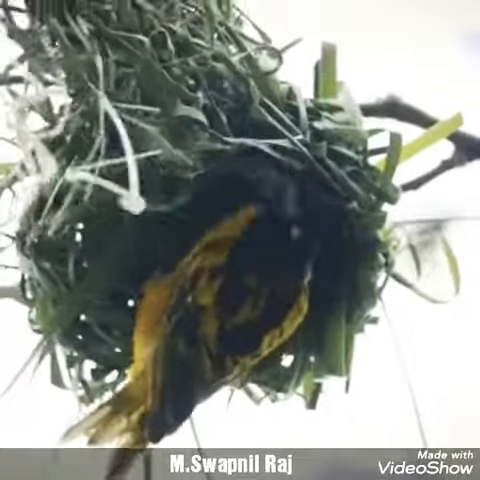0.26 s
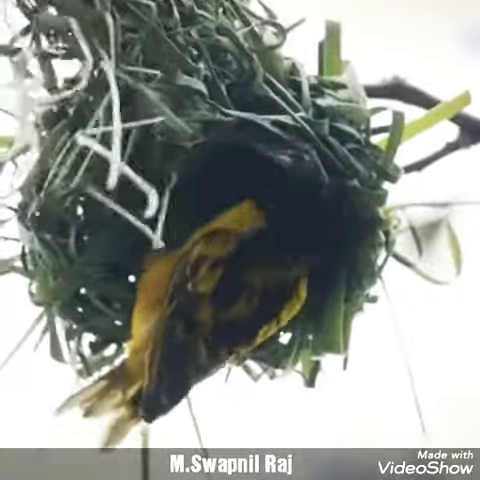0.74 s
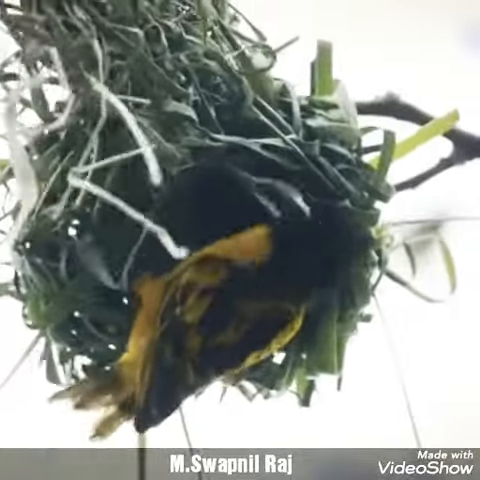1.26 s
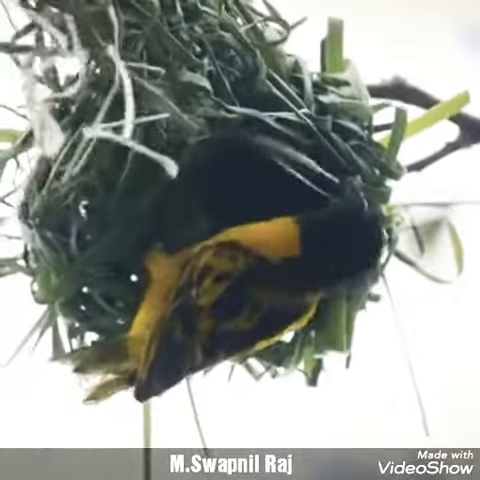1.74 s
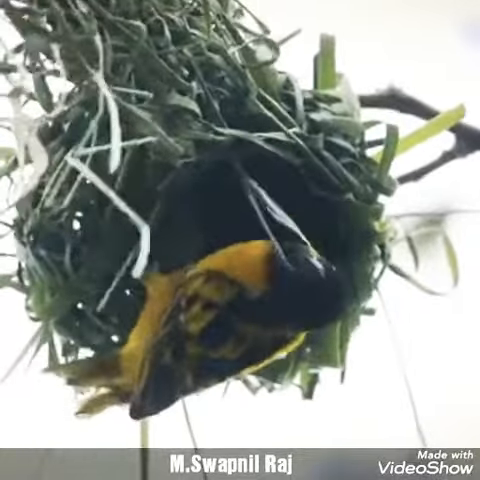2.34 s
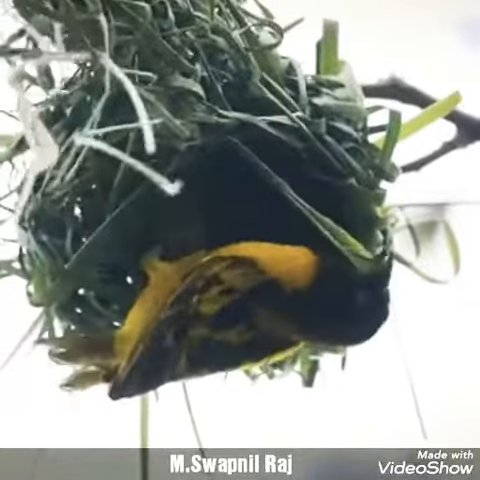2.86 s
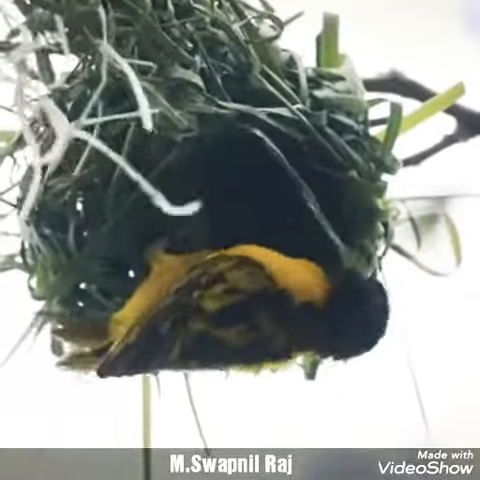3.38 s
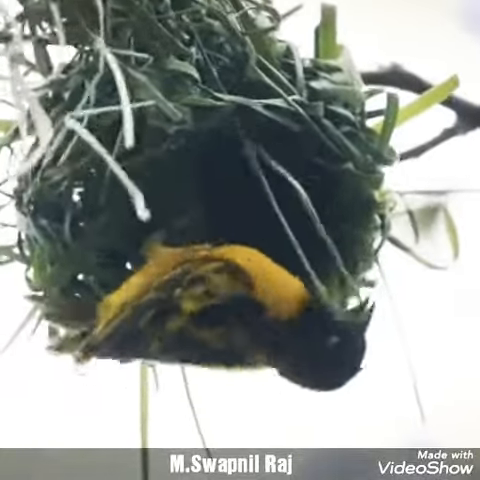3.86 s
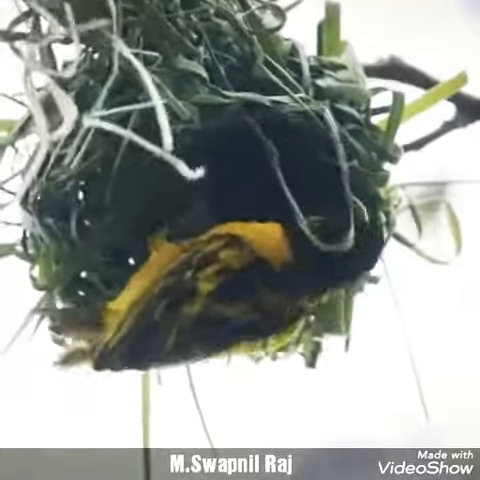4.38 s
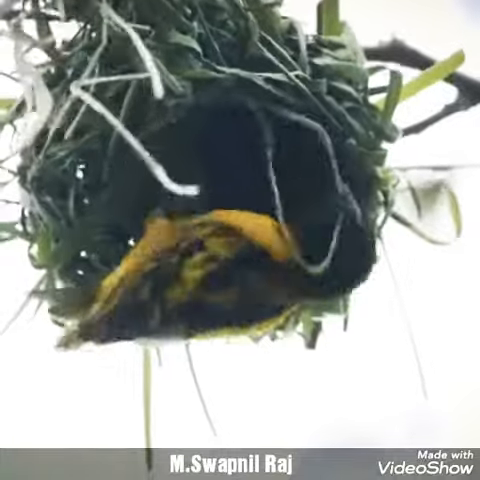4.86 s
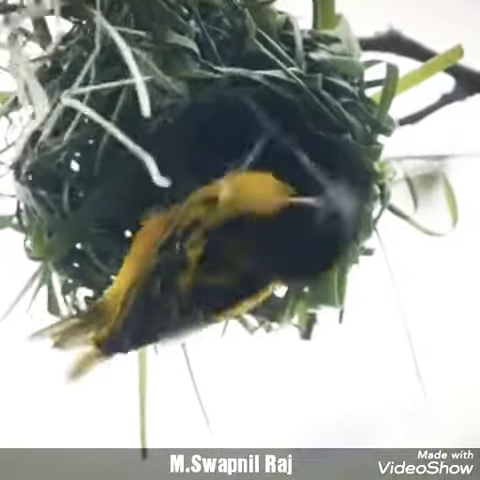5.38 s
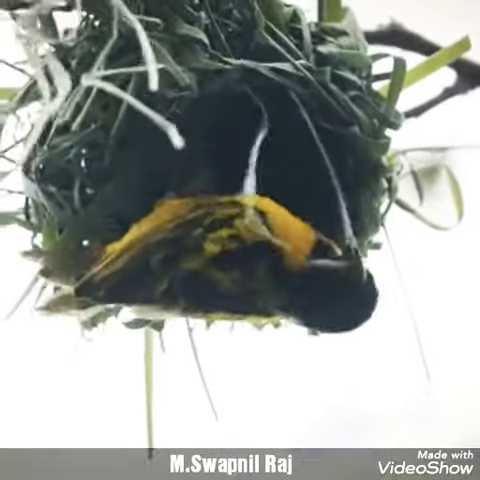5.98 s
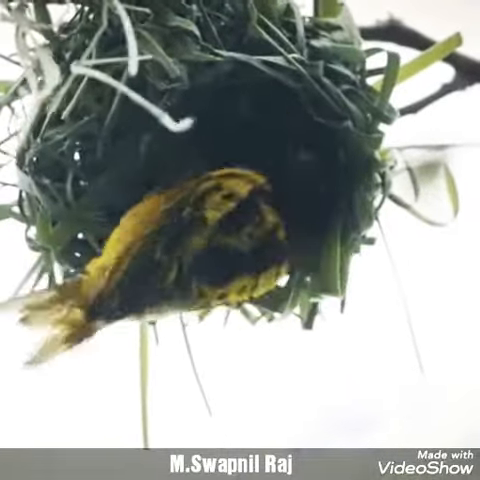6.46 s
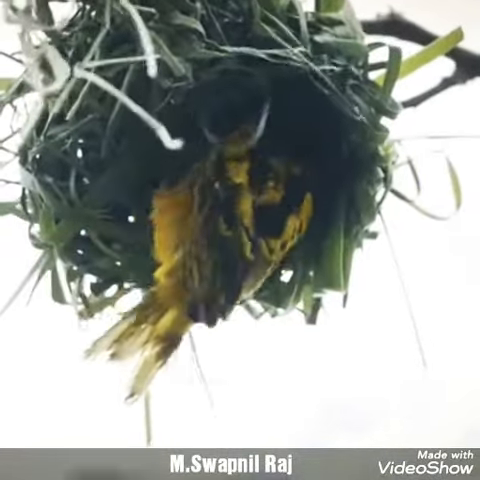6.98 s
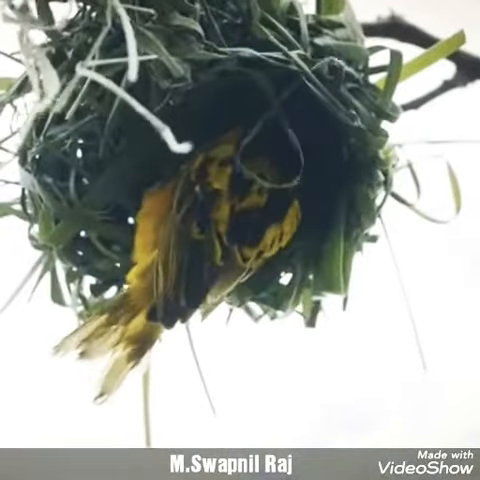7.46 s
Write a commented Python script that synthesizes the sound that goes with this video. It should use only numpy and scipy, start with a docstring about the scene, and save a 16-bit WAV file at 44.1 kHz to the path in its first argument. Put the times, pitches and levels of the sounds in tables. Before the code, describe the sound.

Weaver birds tweet, tick and cheep busily in a tree, with faint rubs of grass and a brief lull crossed by a whistle.

```python
"""Weaver birds chatter in a tree, voiced by vibrating membranes, over a steady outdoor rumble.
A farther bird opens with a warbled phrase above a distant twitter and a faint hum that dies away.
Near birds join with tweets, rasps, chips and ticks, then cheeps that break into gargles, while one tugs
grass into its nest. Near 4 s a long whistle crosses a lull; then the chatter returns with hoarse churrs.
Throughout, foliage scatters the calls; one microphone feeds the left, and the right is almost silent."""
import sys
import numpy as np
from scipy import signal
from scipy.fft import rfft, irfft, next_fast_len
from scipy.io import wavfile
from scipy.ndimage import map_coordinates

SR = 44100
rng = np.random.default_rng(int(sys.argv[2]) if len(sys.argv) > 2 else 0)


def transcribe(signal):
    """Save signal, clipped to [-1, 1], as a 16-bit WAV file at the path in sys.argv[1]."""
    frames = np.atleast_2d(signal).T
    limited = np.clip(frames, -1, 1)
    pcm = np.round(limited * 32767).astype(np.int16)
    wavfile.write(sys.argv[1], SR, pcm)


N = 340893


def from_db(db):
    """Decibels to amplitude ratio."""
    return 10 ** (np.asarray(db) / 20)


def rms_one(x):
    """Normalisation to rms 1."""
    return x / np.sqrt(np.mean(x ** 2) + 1e-20)


def coloured(x, spectrum):
    """Spectral shaping by rows of frequency_hz, gain_db."""
    hz, db = np.transpose(spectrum)
    size = next_fast_len(len(x) + 512)
    bins_hz = np.arange(size // 2 + 1) * SR / size
    gain = from_db(np.interp(np.log(bins_hz + 1), np.log(hz), db))
    return irfft(rfft(x, size) * gain, size)[:len(x)]


def wobble(count, rate_hz):
    """Smooth random modulation with a spread of about 1."""
    steps = np.arange(count) * rate_hz / SR
    knots = rng.standard_normal(int(steps[-1]) + 3)
    return map_coordinates(knots, [steps + 1], order=2, mode="nearest")


def clock(length):
    """Sample times over one sound, in seconds."""
    return np.arange(max(int(length * SR), 64)) / SR


def progress(length):
    """Normalised time, 0 to 1 over one sound."""
    return np.linspace(0, 1, len(clock(length)))


def swell(count, edge):
    """Envelope whose rise and fall together take the share `edge` of the length."""
    return signal.windows.tukey(count, edge)


def add(track, start, sound):
    """Superposition of a sound at its start time."""
    at = int(np.clip(start * SR, 0, N - 1))
    track[at:at + len(sound)] += sound[:N - at]


def syrinx(hz, first_db, octave_db, jitter, shimmer_db,
           third_db=-19, fourth_db=-20, flutter_hz=900, buzz_hz=1100):
    """Membrane oscillation: five harmonics whose pitch and level shake in the unsteady airflow."""
    count = len(hz)
    unsteady_hz = hz * (1 + jitter * wobble(count, flutter_hz))
    phase = 2 * np.pi * np.cumsum(unsteady_hz) / SR
    buzz = .7 + wobble(count, buzz_hz)
    third = from_db(octave_db + third_db) * buzz
    top = from_db(octave_db + fourth_db) * buzz
    gains = [from_db(first_db), from_db(octave_db), third, top, top]
    tone = sum(gain * np.sin(k * phase) * (k * hz < SR / 2) for k, gain in enumerate(gains, 1))
    return np.sqrt(2) * tone * from_db(shimmer_db * wobble(count, 148.4))


def slurs(rows, bow_oct, octave_db, jitter, shimmer_db, edge):
    """Frequency glides along a parabola: both ends sag bow_oct below a straight sweep."""
    out = np.zeros(N)
    for start, length, mid_hz, glide_oct, db in rows:
        u = progress(length) - .5
        hz = mid_hz * 2 ** (glide_oct * u - bow_oct * (2 * u) ** 2)
        add(out, start, syrinx(hz, db, db + octave_db, jitter, shimmer_db) * swell(len(u), edge))
    return out


# spectrum of turbulence in the throat: frequency_hz, gain_db
THROAT_SPECTRUM = [(1900, 1), (3000, 10.5), (5200, -0.5), (8500, 7), (13200, -12), (15500, -28)]

def hoarse(voice, hiss_db):
    """Modulated turbulence: air hisses as the membranes swing, and the throat filters it."""
    hiss = coloured(voice * rng.standard_normal(N), THROAT_SPECTRUM)
    return voice + from_db(hiss_db) * np.std(voice) * rms_one(hiss)


# spectrum of the outdoor rumble: frequency_hz, gain_db
AIR_SPECTRUM = [(18, -50), (30, -32.5), (130, -1.5), (237, 5), (1400, -9.5), (2180, -9), (3070, -10.5),
                (6050, -12), (8720, -19), (13600, -35), (15500, -72)]

def air(level_db=-35.5):
    """Stationary broadband noise, strongest at low frequencies."""
    return from_db(level_db) * rms_one(coloured(rng.standard_normal(N), AIR_SPECTRUM))


# far low tones: pitch_hz, initial_level_db
HUM_TONES = [(290.7, -46.5), (559.9, -51)]

def hum(fade_s=2.1):
    """Gaussian decay: two wavering tones die away in the distance."""
    tones = sum(syrinx(np.full(N, hz), db, db - 38, jitter=.0094, shimmer_db=3.5, flutter_hz=12)
                for hz, db in HUM_TONES)
    return tones * np.exp(-(np.arange(N) / SR / fade_s) ** 2)


def foliage(x, t60_s, gap_s=.0017):
    """Scattering: leaves and branches return a cloud of echoes that decays exponentially."""
    t = clock(.6)
    echoes = rng.standard_normal(len(t)) * from_db(-60 * t / t60_s) * (t > gap_s)
    echoes = signal.lfilter(*signal.butter(1, 8000, fs=SR), echoes)
    return signal.fftconvolve(x, echoes / np.sqrt(np.sum(echoes ** 2)))[:N]


# envelope of the far colony: time_s, level_db
COLONY_ENVELOPE = [(0, -39), (3.2, -37), (3.7, -51.5), (4.84, -39), (5.3, -30.5), (5.85, -42.5),
                   (7.3, -52.5), (7.73, -35)]

def colony(calls=1500, pitch_hz=4000, spread_oct=.34, glide_oct=.4):
    """Incoherent summation: short random slurs of many far birds merge into a twitter."""
    start, length = rng.uniform(0, N / SR, calls), rng.uniform(.013, .072, calls)
    pitch, glide, level = rng.standard_normal((calls, 3)).T
    rows = np.column_stack([start, length, pitch_hz * 2 ** (spread_oct * pitch), glide_oct * glide, level])
    twitter = slurs(rows, bow_oct=.1025, octave_db=-10, jitter=.03, shimmer_db=4.5, edge=1)
    level_db = np.interp(np.arange(N) / SR, *np.transpose(COLONY_ENVELOPE))
    return from_db(level_db) * rms_one(twitter + foliage(twitter, t60_s=.092))


def phrase(points, gain_db, octave_db, jitter):
    """Frequency and amplitude modulation: one unbroken whistle follows a contour."""
    out = np.zeros(N)
    times, hz, db = np.transpose(points)
    t = times[0] + clock(times[-1] - times[0])
    level = np.interp(t, times, db) + gain_db
    tone = syrinx(np.interp(t, times, hz), level, level + octave_db, jitter, shimmer_db=1.2)
    add(out, times[0], tone * swell(len(t), .011))
    return out


# clear notes (the one at 1.228 s is the falling tail of the chip at 1.202 s) and low nasal notes: start_s,
# length_s, mid_pitch_hz, glide_oct, level_db
CLEAR_NOTES = [(.51, 0.024, 3840, 0.2, -35.5), (.585, 0.048, 3780, -0.32, -34.5),
               (1.228, 0.032, 4780, -.4, -39), (1.255, 0.07, 4000, 0.22, -39),
               (1.905, 0.053, 4040, -0.43, -30), (2.285, 0.12, 5245, -0.17, -25.5),
               (2.57, 0.075, 5160, -0.24, -37), (4.76, 0.216, 1860, -.06, -49),
               (6.665, 0.065, 3900, 0.1, -35), (7.22, 0.066, 3860, 0.14, -38)]
NASAL_NOTES = [(3.915, 0.075, 1560, -0.31, -43), (7.478, .022, 2130, -0.88, -39)]
# the opening warble and a long whistle with a catch in it: time_s, pitch_hz, relative_level_db
WARBLE_CONTOUR = [(0.0, 4480, -33), (0.012, 4470, -38.5), (0.084, 3445, -40), (0.092, 3640, -47),
                  (0.148, 4145, -37), (0.178, 3800, -58), (0.204, 3205, -41), (0.234, 3270, -52),
                  (0.242, 3820, -31), (0.276, 4400, -37), (0.296, 4560, -34), (0.352, 3480, -40),
                  (0.388, 4200, -33), (0.4, 4200, -56)]
LONG_CONTOUR = [(3.82, 3086, -51), (3.936, 3026, -37.5), (3.956, 2956, -39), (3.99, 2947, -34),
                (4.002, 3080, -37), (4.04, 3013, -44), (4.15, 2942, -38.5), (4.21, 2880, -50)]

def whistles(octave_db=-28):
    """Harmonic balance sets timbre: pure notes carry a weak octave, nasal ones a strong. Most come from farther
    birds; the clear note at 1.228 s is the falling tail of the near chip at 1.202 s."""
    clear = slurs(CLEAR_NOTES, bow_oct=.036, octave_db=octave_db, jitter=.005, shimmer_db=1.5, edge=.3)
    nasal = slurs(NASAL_NOTES, bow_oct=.17, octave_db=-6, jitter=.015, shimmer_db=2, edge=.5)
    warbled = phrase(WARBLE_CONTOUR, gain_db=4, octave_db=octave_db, jitter=.016)
    long_note = phrase(LONG_CONTOUR, gain_db=5.2, octave_db=octave_db, jitter=.003)
    return clear + nasal + warbled + long_note


# pulls of grass through the weave: start_s, length_s, level_db
GRASS_TUGS = [(0.77, .04, -33.5), (0.972, 0.075, -30.5), (2.062, 0.028, -32.5), (2.318, 0.09, -31),
              (3.054, 0.019, -26.5), (3.296, 0.023, -26.5), (3.722, 0.038, -29), (3.923, 0.064, -33.5),
              (4.149, 0.089, -31.5), (7.472, 0.089, -31.5)]
# spectrum of rubbing grass: frequency_hz, gain_db
GRASS_SPECTRUM = [(500, -38), (1000, -4.5), (1500, 1), (2200, 1.5), (3800, 4), (6500, 3), (9500, -3.5),
                  (15000, -21)]

def grass(slips_per_s=4000, spread_db=5):
    """Stick-slip friction: a blade gives a dense run of tiny clicks that swells with the pull."""
    out = np.zeros(N)
    for start, length, db in GRASS_TUGS:
        count = len(clock(length))
        slips = rng.random(count) < slips_per_s / SR
        strength = from_db(spread_db * rng.standard_normal(count))
        clicks = slips * strength * rng.choice([-1, 1], count)
        rub = rms_one(coloured(clicks, GRASS_SPECTRUM))
        add(out, start, from_db(db) * rub * np.sqrt(np.hanning(count)))
    return out


# thin rising notes: start_s, length_s, top_pitch_hz, level_db
UPSLUR_NOTES = [(0.911, 0.061, 7240, -36.5), (1.298, 0.029, 7570, -36), (4.43, 0.046, 6950, -38),
                (5.41, 0.1, 7320, -35.5)]

def upslurs(climb_oct=1, climb_s=.013):
    """Exponential approach: the pitch shoots upward and levels off toward its top."""
    out = np.zeros(N)
    for start, length, top_hz, db in UPSLUR_NOTES:
        t = clock(length)
        hz = top_hz * 2 ** (-climb_oct * np.exp(-t / climb_s))
        add(out, start, syrinx(hz, db, db - 25, jitter=.012, shimmer_db=2) * swell(len(t), .5))
    return out


# steep zips: centre_s, mid_pitch_hz, glide_oct, level_db
TICK_NOTES = [(1.005, 5700, .4, -32), (1.014, 5500, .4, -35), (1.24, 7000, -0.26, -28),
              (1.333, 6840, .4, -30), (1.347, 6880, -.3, -30), (1.356, 6160, -0.35, -27.5),
              (2.258, 5560, .4, -27), (2.268, 5300, -.7, -25), (2.70, 4960, .8, -33),
              (3.144, 5590, .5, -27), (3.152, 5780, .4, -27), (4.398, 3890, -0.71, -29.5),
              (4.521, 5520, .8, -31), (5.247, 5670, -.8, -31), (5.359, 4520, 0.97, -32),
              (6.3, 5950, -0.69, -28)]

def ticks(length_s=.01):
    """Time-bandwidth trade-off: a sweep this short is heard almost as a click."""
    rows = [(at - length_s / 2, length_s, hz, glide_oct, db) for at, hz, glide_oct, db in TICK_NOTES]
    voice = slurs(rows, bow_oct=0, octave_db=-22, jitter=.018, shimmer_db=1.5, edge=1)
    return hoarse(voice, hiss_db=-12)


# breathy rasps: start_s, length_s, centre_pitch_hz, level_db
RASP_NOTES = [(0.404, 0.066, 3900, -34), (0.623, 0.074, 4600, -38), (1.084, 0.071, 4290, -31),
              (1.325, 0.068, 4160, -33.5), (2.63, 0.16, 4197, -30.5), (4.686, 0.03, 5100, -30),
              (5.145, 0.065, 3600, -29.5), (5.242, 0.04, 4100, -26.5), (5.598, 0.04, 3287, -31.5),
              (6.285, 0.026, 4850, -29.5), (6.534, 0.04, 4200, -31.5)]

def rasps(wander=.1, wander_hz=450):
    """Chaotic vibration of the membranes scatters the pitch about its centre, inside a hiss."""
    out = np.zeros(N)
    for start, length, centre_hz, db in RASP_NOTES:
        count = len(clock(length))
        hz = centre_hz * np.exp(wander * wobble(count, wander_hz))
        voice = syrinx(hz, db, db - 18, jitter=.13, shimmer_db=2.5, flutter_hz=2500)
        add(out, start, voice * np.sqrt(np.hanning(count)))
    return hoarse(out, hiss_db=-7)


# quick squeaks: start_s, length_s, mid_pitch_hz, level_db
SQUEAK_NOTES = [(2.314, 0.021, 4300, -38), (2.629, 0.04, 5245, -26.5), (2.67, 0.0146, 3650, -23.5),
                (2.765, 0.026, 5170, -26), (5.16, 0.014, 5600, -28), (5.251, 0.011, 4950, -24),
                (5.261, 0.0226, 3610, -25.5), (5.339, 0.018, 4030, -31), (6.433, 0.01, 4700, -26.5),
                (7.332, 0.029, 3560, -30)]

def squeaks(glide_oct=-.15):
    """Parabolic frequency sweep: the pitch shoots up and falls back in a tight arch."""
    rows = [(start, length, hz, glide_oct, db) for start, length, hz, db in SQUEAK_NOTES]
    voice = slurs(rows, bow_oct=.5, octave_db=-18, jitter=.024, shimmer_db=1.6, edge=.5)
    return hoarse(voice, hiss_db=-13)


# hoarse churrs: start_s, relative_level_db
CHURR_CALLS = [(4.882, -36), (5.109, -34.5), (5.577, -35), (6.961, -34.5)]
# contour of every churr: time_s, pitch_hz, gain_db
CHURR_CONTOUR = [(0, 2924, 7), (.0055, 6763, 5), (.011, 4167, 7), (.028, 3850, 3.5), (0.04, 3900, 3),
                 (0.056, 3450, 5.5), (.067, 6260, 6), (0.075, 3250, 6)]

def churrs():
    """Frequency modulation in one breath: a squeak, a hoarse sinking note and a second squeak."""
    out = np.zeros(N)
    times, hz, gain_db = np.transpose(CHURR_CONTOUR)
    t = clock(times[-1])
    for start, level_db in CHURR_CALLS:
        db = level_db + np.interp(t, times, gain_db)
        tone = syrinx(np.interp(t, times, hz), db, db - 13, jitter=.03, shimmer_db=2, flutter_hz=1500)
        add(out, start, tone * swell(len(t), .015))
    return hoarse(out, hiss_db=-9.5)


# rough tweets: start_s, length_s, mid_pitch_hz, relative_level_db
TWEET_NOTES = [(0.203, 0.014, 5130, -33.5), (1.119, 0.039, 5110, -28.5), (3.196, 0.017, 4560, -36.5),
               (3.26, 0.051, 5270, -32.5), (4.112, 0.03, 3420, -40.5), (4.273, 0.034, 3400, -38.5),
               (4.328, 0.017, 4900, -38.5), (4.516, 0.03, 4890, -31), (4.993, 0.022, 5260, -35),
               (5.017, 0.019, 5020, -33), (5.064, .024, 3380, -37), (5.474, 0.019, 5090, -33.5),
               (5.554, 0.027, 5260, -30), (5.972, 0.026, 4860, -34.5), (6.146, 0.039, 3256, -38),
               (7.427, 0.019, 5420, -34.5), (7.656, 0.031, 5380, -28.5)]

def tweets(glide_oct=.526, bow_oct=.14, undertone_db=-10):
    """Subharmonic voicing: a rough sweep rises and levels off over a weak tone an octave lower."""
    out = np.zeros(N)
    for start, length, mid_hz, db in TWEET_NOTES:
        u = progress(length) - .5
        hz = mid_hz * 2 ** (glide_oct * u - bow_oct * (2 * u) ** 2)
        tone = syrinx(hz / 2, db + undertone_db, db,
                      jitter=.022, shimmer_db=1.9, third_db=-15, fourth_db=-24)
        add(out, start, tone * swell(len(u), .75))
    return from_db(2.2) * hoarse(out, hiss_db=-13)


# arched chips: start_s, length_s, top_pitch_hz, relative_level_db, octave_gain_db, third_over_octave_db
CHIP_NOTES = [(0.554, 0.04, 3160, -37.5, -2, -12), (0.76, 0.04, 3060, -34.5, 1.5, -10),
              (1.202, 0.033, 3360, -30.5, 5, -12), (2.029, 0.032, 3320, -30.5, -1.5, -10.5),
              (2.45, 0.033, 3285, -31.5, -1.5, -18), (2.712, 0.037, 3340, -30.5, -2, -16),
              (2.819, 0.042, 2805, -36, -1.5, -11), (2.891, 0.039, 2930, -37.5, 3, -11),
              (3.369, 0.039, 3350, -32.5, -4.5, -13), (4.693, 0.052, 3270, -31, -16, -21),
              (6.049, 0.041, 3330, -33.5, 2, -17), (6.343, 0.049, 3000, -39.5, -4, -22),
              (7.194, 0.047, 3150, -33.5, 0, -19), (7.349, 0.042, 3170, -34.5, 1, -16)]

def chips(crest_share=.366, climb_oct=.48, drop_oct=.503, sag_db_per_oct=18):
    """Coupled pitch and amplitude: both climb to a crest and drop, in a tone rich in harmonics."""
    out = np.zeros(N)
    for start, length, top_hz, db, octave_db, third_db in CHIP_NOTES:
        u = progress(length)
        climb = climb_oct * (1 - u / crest_share) ** 2
        drop = drop_oct * (np.abs(u - crest_share) / (1 - crest_share)) ** 1.6
        sag_oct = np.where(u < crest_share, climb, drop)
        level = db - sag_db_per_oct * sag_oct
        tone = syrinx(top_hz * 2 ** -sag_oct, level, level + octave_db, jitter=.005, shimmer_db=1.1,
                      third_db=third_db, fourth_db=third_db - 6, buzz_hz=600)
        add(out, start, tone * swell(len(u), .18))
    return from_db(2) * hoarse(out, hiss_db=-18)


def gargle(held_hz, db, length, warble_hz=87.3, warble_oct=.17, sink_oct=.62, fade_db=20.5):
    """Beak resonance: as the voice tumbles and its fundamental fades, the octave flares at the peak."""
    beak_hz, beak_db_per_oct = 4850, 19.5
    t, u = clock(length), progress(length)
    warble = np.cos(2 * np.pi * warble_hz * rng.uniform(.923, 1.12) * t)
    hz = held_hz * 2 ** (warble_oct * warble - .0501 - sink_oct * u)
    first_db = db + 5.5 + 4 * warble - fade_db * u  # jumps at the break, then pulses and fades
    octave_db = db - beak_db_per_oct * np.abs(np.log2(2 * hz / beak_hz))
    return syrinx(hz, first_db, octave_db, jitter=.018, shimmer_db=1.5) * swell(len(t), .25)


# cheeps: start_s, held_length_s, mid_pitch_hz, mid_level_db, octave_gain_db, gargle_length_s
CHEEP_NOTES = [(1.428, 0.043, 3507, -25.5, -16, 0.022), (1.532, 0.053, 3560, -26, -18, 0.02),
               (1.669, 0.054, 3670, -25.5, -13.5, 0.027), (1.834, 0.052, 3703, -24.5, -12, 0.025),
               (4.903, 0.037, 3330, -29.5, -15, 0.029), (5.363, 0.05, 3670, -32.5, -12, 0.021),
               (5.659, 0.044, 3570, -30.5, -5, 0.027), (5.876, 0.062, 3600, -29, -16.5, 0.026),
               (6.183, .044, 3417, -26.5, -12.5, .024), (6.401, 0.057, 3404, -30, 0.5, 0.046),
               (6.607, 0.043, 3306, -27.5, -5.5, 0.022), (6.785, 0.061, 3370, -25.5, -8, 0.019),
               (7.016, 0.039, 3310, -29, -9.5, 0.021)]

def cheeps(scoop_oct=.474, scoop_s=.00409, rise_oct_per_s=.98, attack_s=.0055, swell_db=7, waver_db=.2):
    """Voice break: a note scoops up, creeps higher as it swells, then breaks into a gargle."""
    held, broken = np.zeros(N), np.zeros(N)
    for start, length, mid_hz, db, octave_db, gargle_s in CHEEP_NOTES:
        t = clock(length)
        hz = mid_hz * 2 ** (rise_oct_per_s * (t - length / 2) - scoop_oct * np.exp(-t / scoop_s))
        level = db + swell_db * (t / length - .5) - waver_db * wobble(len(t), 82)
        tone = syrinx(hz, level, level + octave_db, jitter=.009, shimmer_db=1.1,
                      third_db=-16, fourth_db=-18, buzz_hz=700)
        add(held, start, tone * swell(len(t), .04) * np.minimum(t / attack_s, 1))
        add(broken, start + length, gargle(hz[-1], db + max(octave_db, 0), gargle_s))
    return hoarse(held, hiss_db=-18) + hoarse(broken, hiss_db=-15)


# treble response of the near birds' beaks: frequency_hz, gain_db
BEAK_RESPONSE = [(7000, 1.5), (9500, -0.5), (11800, -3), (13600, 2), (15200, -9)]

def scene():
    """Superposition at one microphone on the left; the right channel holds only a faint hiss."""
    voices = chips() + cheeps() + churrs() + tweets() + upslurs() + squeaks() + ticks() + rasps()
    near = coloured(voices, BEAK_RESPONSE) + grass()
    rumble = air()
    farther = whistles()
    echoes = from_db(-5.5) * foliage(near + .5 * farther, t60_s=.13)
    left = near + farther + echoes + colony() + rumble + hum()
    right = from_db(-59) * rng.standard_normal(N)
    return np.array([left, right])


def record(dry):
    """Band limiting: a steep elliptic low-pass removes the highest treble."""
    cutoff_hz = 15400
    return signal.sosfilt(signal.ellip(10, .1, 90, cutoff_hz, fs=SR, output="sos"), dry)


dry = scene()
out = record(dry)
transcribe(out)
```